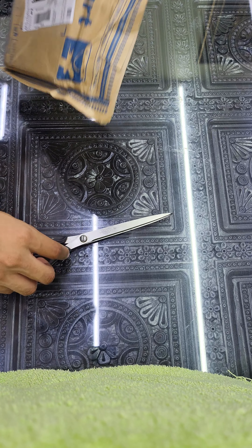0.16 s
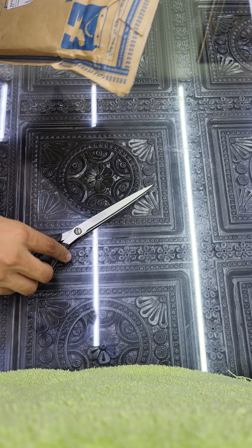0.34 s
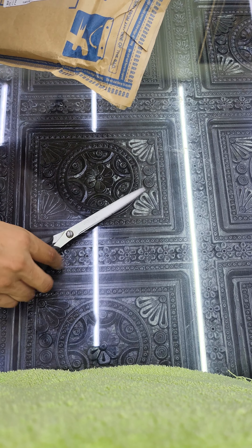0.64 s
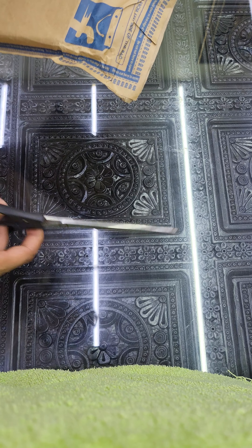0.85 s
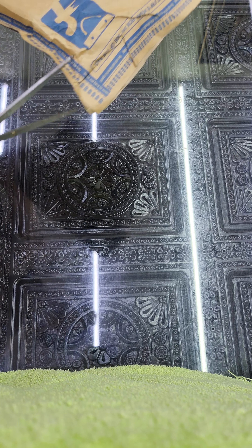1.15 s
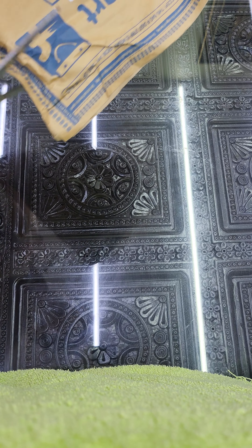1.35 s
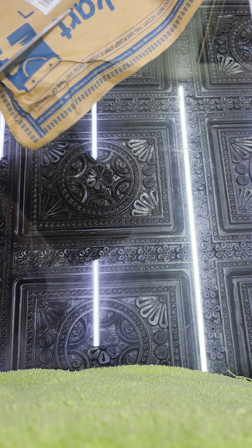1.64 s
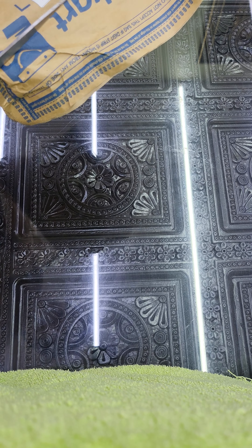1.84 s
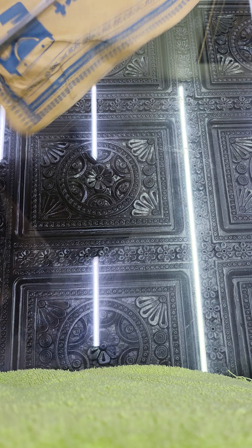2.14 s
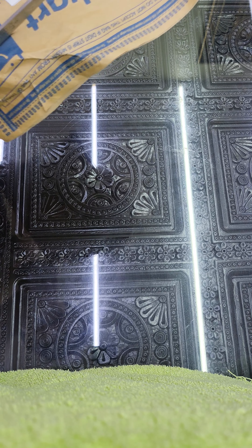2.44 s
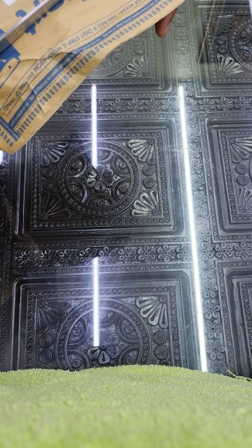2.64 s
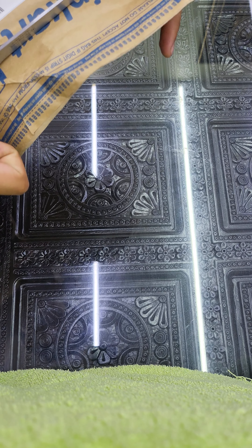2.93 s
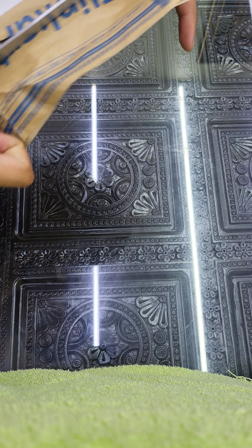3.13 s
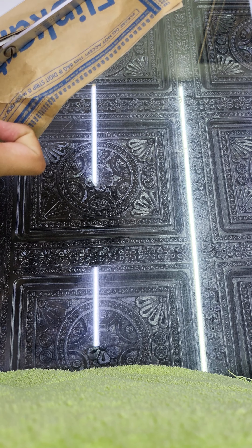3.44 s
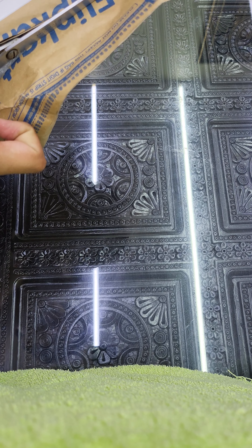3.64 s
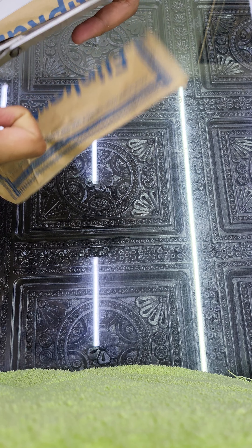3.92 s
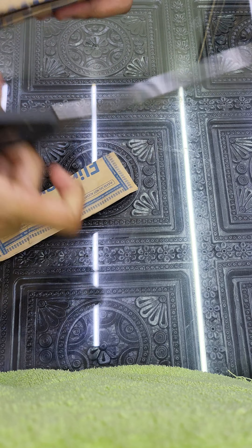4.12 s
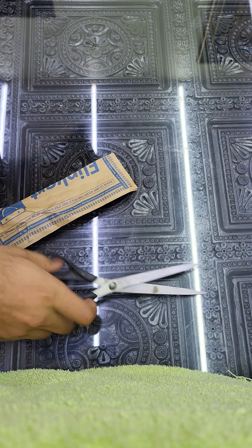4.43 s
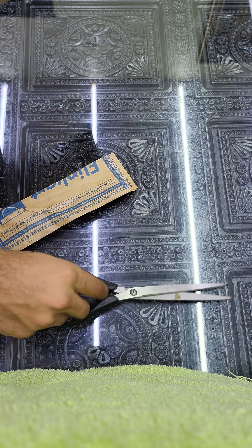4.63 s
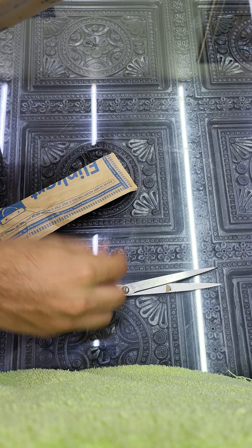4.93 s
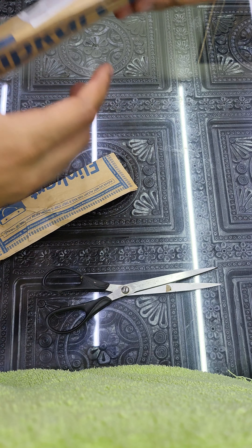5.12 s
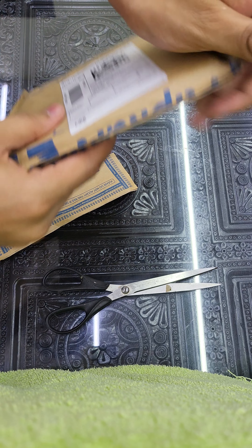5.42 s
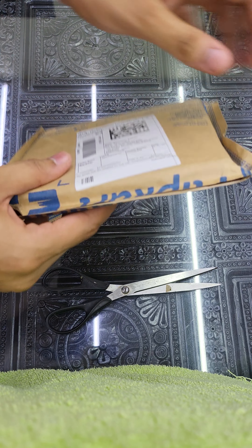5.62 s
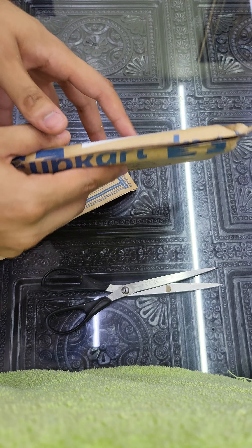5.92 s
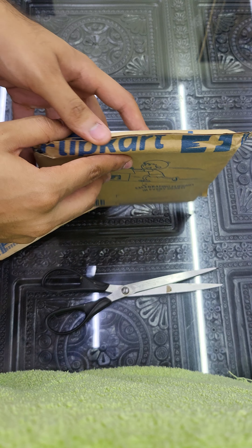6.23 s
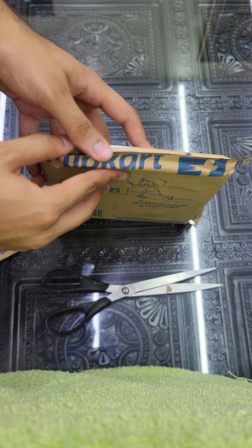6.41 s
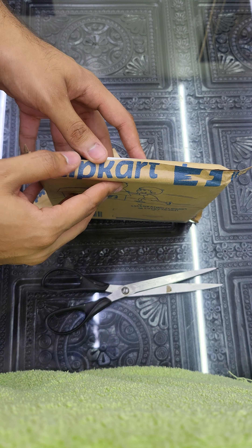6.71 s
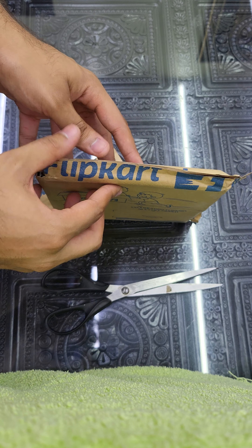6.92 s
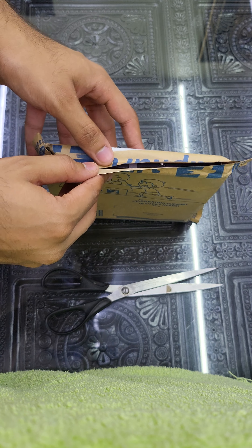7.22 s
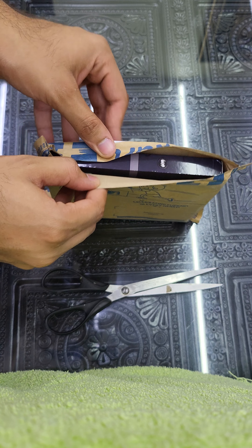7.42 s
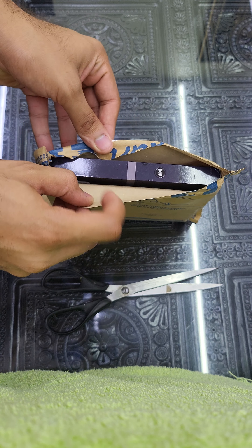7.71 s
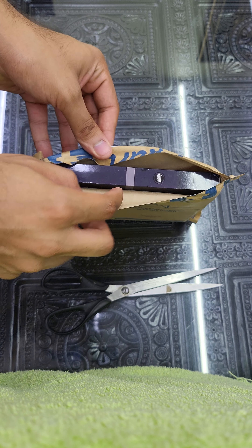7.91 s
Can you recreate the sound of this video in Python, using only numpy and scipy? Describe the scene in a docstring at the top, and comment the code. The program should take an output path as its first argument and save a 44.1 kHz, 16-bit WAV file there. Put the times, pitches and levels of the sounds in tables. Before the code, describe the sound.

Close stereo pickup in a bare, lively room with a low mains hum and soft fan. Scissors scrape and knock as they leave a hard table, then bite into a padded paper mailer with hollow pops, crunching and dry ticks. A bright steel snip ends the cut. The scissors clatter back down, then the paper is turned with soft taps, faint fingertip swishes and one tiny squeak, before crisp snaps as it opens.

```python
"""In a bare, ringing room with a low mains hum and a soft fan, someone opens a padded paper mailer.
Scissors leave a hard table, cut off the mailer's end and clatter back: noise bursts ring the steel blades
or the hard table top. Hands then turn the mailer and pull it open: noise bursts through creased paper snap
and boom like a small drum, while hiss and tiny rings make the rustle. Fingertips swish along the cut edge,
and one squeaks briefly. There are two microphones; the left one is nearer to the hands."""
import sys
import numpy as np
from scipy import signal
from scipy.fft import rfft, irfft, next_fast_len
from scipy.io import wavfile
from scipy.ndimage import map_coordinates

SR = 44100
rng = np.random.default_rng(int(sys.argv[2]) if len(sys.argv) > 2 else 0)


def persist_wave(psi):
    """Save psi, clipped to +-1, as 16-bit WAV."""
    counts = np.round(np.clip(psi, -1, 1) * 32767).astype(np.int16)
    wavfile.write(sys.argv[1], SR, np.atleast_2d(counts).T)


N = 355446  # length of the scene in samples


def amp(db):
    """Turn decibels into a gain."""
    return 10 ** (np.asarray(db) / 20)


def unit(x):
    """Scale a sound to an rms of 1."""
    return x / np.sqrt(np.mean(x ** 2) + 1e-20)


def along(points, hz):
    """Read a curve of (f/Hz, value) points at any pitch, on a log pitch axis."""
    f, v = np.transpose(points)
    return np.interp(np.log(hz + 1), np.log(f + 1), v)


def wobble(rate):
    """A smooth random curve with this many random points a second."""
    points = rng.standard_normal(int(N * rate / SR) + 4)
    return map_coordinates(points, [np.arange(N) * rate / SR], order=2)


def filtered(x, response):
    """Shape a sound by a response that depends on frequency."""
    n = x.shape[-1]
    padded = 2 * next_fast_len(n // 2 + 2048)
    spectrum = rfft(x, padded) * response(np.fft.rfftfreq(padded, 1 / SR))
    return irfft(spectrum, padded)[..., :n]


def causal(gain):
    """Turn a gain curve into a minimum-phase response, which rings only after the blow."""
    cepstrum = irfft(np.log(np.maximum(gain, 1e-6)))
    half = len(cepstrum) // 2
    cepstrum[1:half] *= 2
    cepstrum[half + 1:] = 0
    return np.exp(rfft(cepstrum))


def resonance(f, centre, width):
    """The response of one damped resonance."""
    return 1j * f * width / (centre * centre - f * f + 1j * f * width)


def ringing(hz, modes):
    """A hard body rings at its own resonances, with deep valleys between them."""
    power = sum(amp(db) * np.abs(resonance(hz, centre, width)) ** 2 for centre, width, db in modes)
    return causal(power)


def grains(rate, centre_hz, scatter, cycles, spread_db, size):
    """Tiny damped rings at random moments, each with its own pitch and force; rms 1."""
    count = int(rate * N / SR)
    when, force, pitch = rng.random((count, 3)).T
    hz = centre_hz * 2 ** (scatter * np.log((pitch + .02) / (1.02 - pitch)))
    turns = hz[:, None] * np.arange(size) / SR
    # each ring falls by 60 dB in the given number of cycles; a few are much stronger
    rings = np.sin(2 * np.pi * turns) * amp(-60 * turns / cycles + spread_db * force[:, None] ** 3)
    signs = rng.choice([-1, 1], (count, 1))
    index = (when * N).astype(int)[:, None] + np.arange(size)
    return unit(np.bincount(index.ravel(), (signs * rings).ravel(), N + size)[:N])


def add(track, s, sound):
    """Mix a sound into the track at time s."""
    start = max(round(s * SR), 0)
    part = sound[:, :N - start]
    track[:, start:start + part.shape[1]] += part


# how alike sound from all sides is at the two microphones: (f/Hz, likeness from 0 to 1)
LIKENESS = [(60, 0.81), (200, 0.87), (450, 0.51), (900, 0), (8000, 0.44)]


def diffuse(n, colour):
    """Noise from all sides: most alike at both microphones in the bass, unlike near 900 Hz."""
    def middle_and_side(hz):
        turn = np.arccos(np.clip(along(LIKENESS, hz), -1, 1)) / 2
        return amp(along(colour, hz)) * [np.cos(turn), np.sin(turn)]
    mid, side = filtered(rng.standard_normal((2, n)), middle_and_side)
    return np.array([mid + side, mid - side])


# how long the room rings at each pitch: (f/Hz, time to fall by 60 dB/s)
ROOM_DECAY = [(150, 0.53), (400, 0.65), (1200, 0.56), (3000, 0.59), (7000, 0.62), (15000, 0.55)]
# tone colour of the ringing: (f/Hz, relative level/dB)
ROOM_COLOUR = [(150, -5.5), (400, -2.5), (1200, 0.5), (3000, 4.5), (7000, 2), (15000, -4)]
LEAD_S, LEFT_DB = .00045, 6.5  # direct sound: head start and extra level at the left microphone
WALL_S, WALL_DB = .0072, -14.5  # nearest wall: delay, and level next to the direct sound


def in_room(x, direct_db, room_db):
    """Direct sound arrives first and louder at the left; one wall echo and a fresh random tail join it."""
    hz, t, z = signal.stft(diffuse(SR * 3 // 4, ROOM_COLOUR), SR, nperseg=256)
    decay = amp(-60 * t / along(ROOM_DECAY, hz)[:, None])
    tail = signal.istft(z * decay, SR, nperseg=256)[1]
    # reflections take a moment to build up
    tail *= 1 - np.exp(-(np.arange(tail.shape[1]) / SR / 0.0013) ** 2)
    tail /= np.linalg.norm(tail[0])
    out = signal.fftconvolve(x[None], tail, axes=1) * amp(room_db) * amp([[.3], [-.3]])
    late = filtered(x, lambda hz: np.exp(-2j * np.pi * hz * LEAD_S))
    out[:, :len(x)] += amp(direct_db) * np.array([x * amp(LEFT_DB / 2), late * amp(-LEFT_DB / 2)])
    echo = filtered(x, lambda hz: np.exp(-2j * np.pi * hz * WALL_S))
    out[:, :len(x)] += amp(direct_db + WALL_DB) * echo
    return out


RUN_UP_S, SPILL_FADE_S = .012, .03  # room left before the blow; time constant of the fade over it


def blow(body, db, boom_db, tilt_db, fizz_db, contact, boom_stretch):
    """A brief rough contact heard through a body; its bass has its own length."""
    t = np.arange(SR // 8) / SR - RUN_UP_S
    # fades what the flattened burst spills before the blow, which softens its onset
    spill_fade = np.exp(np.minimum(t, 0) / SPILL_FADE_S)

    def tilted_body(hz):
        return body(hz) * causal(amp(tilt_db * np.log2(np.clip(hz, 800, 5000) / 800)))

    bands = [  # (lowest and highest f/Hz, level next to the middle band/dB, time to fall by 60 dB/s)
        ((90, 800), boom_db, contact * boom_stretch),
        ((800, 8000), 0, contact),
        ((8000, 16000), fizz_db, contact)]
    sound = np.zeros(len(t))
    for band, share_db, life in bands:
        burst = rng.standard_normal(len(t)) * (t > 0) * amp(-60 * np.abs(t) / life)
        force = rfft(burst)
        # many tiny slips excite all pitches evenly: flatten the burst's spectrum
        force = spill_fade * irfft(force / (np.abs(force) + 1e-12), len(t))
        bandpass = signal.butter(4, band, "bandpass", fs=SR, output="sos")
        part = signal.sosfilt(bandpass, filtered(force, tilted_body))
        sound += amp(db + share_db) * part / np.linalg.norm(part)
    return sound


def strikes(events, body, boom_stretch, direct_db, room_db):
    """Play every blow of a table in the room, which rescales its level; last columns shape the body."""
    out = np.zeros((2, N))
    for s, db, boom_db, tilt_db, fizz_db, contact, *shape in events:
        sound = blow(lambda hz: body(hz, *shape), db, boom_db, tilt_db, fizz_db, contact, boom_stretch)
        add(out, s - RUN_UP_S, in_room(sound, direct_db, room_db))
    return out


FIZZ_PER_TILT = 2.27  # dB of fizz for each dB per octave of brightness


def fizz(base_db, tilt_db):
    """A harder contact is brighter and fizzes more: level of its top octave."""
    return base_db + FIZZ_PER_TILT * tilt_db


# tone colour of creased paper as a phone records it, dull above 8 kHz: (f/Hz, relative level/dB)
CREASE_COLOUR = [(80, -8), (150, -10.5), (205, -3), (320, 6), (470, 6.5), (620, 1), (760, -3.5), (880, 0.5),
                 (1050, -1), (1400, 1.5), (1750, -4.5), (2100, -0.5), (2800, 1), (4100, -3), (5200, -5.5),
                 (7600, -8), (8600, -26), (16000, -24)]
FOLD_DB, FOLD_OCTAVES = 3.5, .13  # greatest height and spacing of a fold's random peaks and dips
PANEL_Q = 13  # sharpness of the panel's note under a bite


def panel(hz, note_hz, note_db, q):
    """Each fold of paper has its own uneven resonances, and one flexing panel's note stands out."""
    place = np.log2(np.maximum(hz, 200) / 200) / FOLD_OCTAVES
    folds = FOLD_DB * np.tanh(map_coordinates(rng.standard_normal(size=64), [place], order=2))
    note = 1 + (amp(note_db) - 1) * resonance(hz, note_hz, note_hz / q)
    return causal(amp(along(CREASE_COLOUR, hz) + folds)) * note


# steady mains hum: (f/Hz, rms level/dB)
MAINS_HUM = [(100.15, -52.5)]
# lines of the fan motor, around which they waver: (f/Hz, peak level/dB)
FAN_LINES = [(75.2, -63), (149.6, -70)]
# tone colour of the fan's rush of air: (f/Hz, relative level/dB)
AIR_COLOUR = [(15, -45.5), (25, -32), (50, -4.5), (75, -4.5), (108, -8), (137, -15.5), (185, -10),
              (275, -23.5), (317, -4), (355, -19), (410, -15.5), (516, -22), (1890, -30), (3080, -35.5),
              (3520, -28), (5140, -42), (7510, -42), (16000, -65.5)]
FAN_WAVER_DB = 1.5


def room_tone():
    """Steady mains hum, the wavering lines of a fan motor and its soft rush of air."""
    t = np.arange(N) / SR
    hum = sum(amp(db + 3.0) * np.sin(2 * np.pi * hz * t) for hz, db in MAINS_HUM)  # rms to peak: +3 dB
    fan = np.zeros(N)
    for hz, db in FAN_LINES:
        level = amp(db + FAN_WAVER_DB * wobble(3.6))
        fan += level * np.sin(2 * np.pi * hz * t + .5 * wobble(2.8))
    rush = amp(-57.5) * unit(diffuse(N, AIR_COLOUR))
    return (hum + fan) * amp([[-.3], [.3]]) + rush


# strokes of fingers or blades along the paper, levels before mixing:
# (start t/s, length/s, rustle level/dB, hollow boom level/dB)
PAPER_STROKES = [(0.0, 0.067, -62.5, -51), (1.476, 0.112, -50.5, -41), (1.717, 0.081, -52.5, -43.5),
                 (1.973, 0.14, -51, -35.5), (2.012, 0.068, -48.5, -48), (2.348, 0.124, -41.5, -54),
                 (2.509, 0.15, -45.5, -39.5), (2.751, 0.31, -46.5, -35.5), (2.814, 0.044, -52.5, -55),
                 (3.125, 0.21, -47.5, -37), (3.196, 0.074, -46.5, -52), (3.489, 0.26, -66, -45),
                 (5.256, 0.12, -54, -46), (5.421, 0.19, -54.5, -46), (5.906, 0.19, -63, -48),
                 (6.093, 0.34, -62, -47.5), (6.436, 0.097, -63, -62.5), (6.815, 0.17, -59, -60),
                 (7.042, 0.095, -65, -60.5), (7.37, 1, -61, -44), (7.66, 0.04, -83.5, -66),
                 (7.88, 0.15, -97, -71)]
# tone colour of the sliding hiss as a phone records it, duller above 8 kHz: (f/Hz, relative level/dB)
PAPER_COLOUR = [(88, -44), (150, -24), (422, -10.5), (524, -42.5), (624, 10), (702, -1), (871, -3),
                (1060, -4.5), (1420, -11.5), (2920, -10.5), (5150, -19), (7470, -20), (8730, -32.5),
                (11700, -27), (16000, -36.5)]
STROKE_RISE_SHARE, STROKE_RELEASE_S = 0.13, 0.0053  # rise as a share of the stroke; fade at lift-off
UNEVEN_DB, UNEVEN_RATE = 2.0, 45  # uneven hand: depth, random points a second
CRACKLE_SHARE = 0.5  # gain of the sparse sharp crackles heard under any touch


def rustle():
    """Fingers and blades work the paper: hiss, crunching fibres and slower jerks drumming on the mailer."""
    t = np.arange(N) / SR
    fine, hollow = np.zeros(N), np.zeros(N)
    for s, length, rustle_db, boom_db in PAPER_STROKES:
        rise = np.clip((t - s) / (STROKE_RISE_SHARE * length), 0, 1)
        release = np.clip(1 - (t - s - length) / STROKE_RELEASE_S, 0, 1)
        fine += rise * release * amp(rustle_db)
        hollow += rise * release * amp(boom_db)
    # a firm grip sticks and crunches, a light touch mostly slides
    firmness = fine / (fine + amp(-46.5))
    grip = unit(amp(0.88 * firmness * wobble(90) + UNEVEN_DB * wobble(UNEVEN_RATE)))

    def hiss_colour(hz):
        without_bass = 1 / (1 + (850 / (hz + 1)) ** 4)
        return amp(along(PAPER_COLOUR, hz)) * without_bass

    hiss = unit(filtered(rng.standard_normal(N), hiss_colour))
    fibres = grains(rate=520, centre_hz=2400, scatter=.5, cycles=10, spread_db=15, size=512)
    jerks = grains(rate=110, centre_hz=423.0, scatter=0.23, cycles=16.0, spread_db=13.0, size=2048)
    crackles = grains(rate=70, centre_hz=3800, scatter=0.6, cycles=4, spread_db=14, size=256)
    crunch = np.sqrt(1 - firmness ** 2) * hiss + firmness * fibres + CRACKLE_SHARE * crackles
    sound = grip * (fine * crunch + amp(-12.0) * hollow * jerks)
    return in_room(sound, direct_db=-4, room_db=-7)[:, :N]


# paper buckles, scuffs or drops, in the hands, under the blades or on the table:
# (t/s, level/dB, boom/dB, brightness/dB per octave, contact/s,
# panel note f/Hz, strength of that note/dB, its sharpness Q)
PAPER_SNAPS = [(0.063, -20.5, 3, -7.5, 0.025, 706, 15, 12), (0.206, -20, -15, -8, 0.035, 3980, 19, 5.2),
               (0.199, -4.5, -5, -11.5, 0.36, 445, 14, 12), (1.51, -10, -4.5, -4, 0.11, 1860, 12, 20),
               (1.556, -9, -7.5, -7.5, 0.018, 1660, 11.5, 14), (2.217, 3, -18, -4, 0.0024, 3100, 15, 1.1),
               (2.24, -19, 6, -3, 0.06, 3900, 13, 4), (4.156, -8.5, -9, -4.5, 0.037, 1160, 8, 5),
               (4.19, -12, 2.5, -2, 0.0096, 738, 15, 6), (5.501, -12, -28, -3, 0.045, 1140, 13, 13),
               (7.158, -17.5, -5, -6, 0.0097, 2530, 12, 6), (7.159, -16, -14, -1.5, 0.0064, 3560, 14, 12),
               (7.496, -9.5, -15, -3, 0.004, 3170, 17, 2.5), (7.661, 2, -2, -5, 0.0069, 1550, 7, 3.6),
               (7.665, -16, 8, -19, 0.032, 700, 24, 10), (7.676, -15, -5, -3, 0.031, 1160, 15, 4.4),
               (7.69, -14, -14, -8, 0.13, 2150, 29, 7.6), (7.829, -17.5, -8, -11.5, 0.0097, 2140, 13, 6),
               (7.982, -6.5, -9, -6, 0.0088, 614, 16, 8.6), (7.992, -18.5, 8, -9, 0.035, 617, 23, 7)]
SNAP_FIZZ_DB = -14  # before brightness is added


def paper_snaps():
    """Creased paper cracks or scuffs, one of its panels rings briefly and the air in the mailer booms."""
    snaps = [(s, db, boom, tilt, fizz(SNAP_FIZZ_DB, tilt), contact, *note)
             for s, db, boom, tilt, contact, *note in PAPER_SNAPS]
    return strikes(snaps, panel, boom_stretch=2.6, direct_db=-4.0, room_db=-5.5)


# fingertips tap the mailer: (t/s, level/dB, boom/dB, panel note f/Hz)
FINGER_TAPS = [(0.133, -25, -6, 1290), (0.187, -34.5, 16, 202), (4.029, -14.5, -6, 607),
               (5.303, -19.5, -4, 1200), (5.356, -16.5, -8, 1064), (5.741, -22, -4, 1050),
               (5.864, -21.5, -14, 1110), (5.983, -27.5, 0, 764)]
TAP_TILT_DB, TAP_FIZZ_DB, TAP_CONTACT_S = -7, -38, 0.0097  # tilt is per octave
TAP_NOTE_DB, TAP_Q = 15, 18


def finger_taps():
    """Soft fingertips give a short, dull blow that sets a paper panel ringing."""
    taps = [(s, db, boom, TAP_TILT_DB, TAP_FIZZ_DB, TAP_CONTACT_S, hz, TAP_NOTE_DB, TAP_Q)
            for s, db, boom, hz in FINGER_TAPS]
    return strikes(taps, panel, boom_stretch=1.6, direct_db=0, room_db=-7)


# the blades slide and click together: (t/s, level/dB, thump/dB, brightness/dB per octave, contact/s)
BLADE_CLICKS = [(0.161, -33, -18, -10, 0.0054), (0.534, -31, -11, 1, .006), (0.673, -25.5, 6, -4, 0.025),
                (0.99, -28, -21, 1.5, 0.077), (1.053, -27.5, -16, -2, 0.0052), (1.458, -33, 1, -9, 0.0052),
                (3.914, -9, -10, -6, 0.0045), (3.918, 4.5, -8, 0, 0.0064), (3.929, -12, -15, 7, 0.052),
                (4.618, -37, -15, 0, .012), (7.97, -25.5, -14, -5, 0.0071)]
# the steel blades' resonances: (f/Hz, width/Hz, relative level/dB)
BLADE_MODES = [(421, 540, 3.5), (1320, 530, 2), (2040, 160, 6), (2476, 280, 2), (3420, 800, -6),
               (4200, 810, -1), (5780, 500, -1), (7700, 960, 0), (9960, 1900, -1), (12700, 2100, 0.5),
               (6000, 9400, -7)]
SNIP_FIZZ_DB = -3.5  # before brightness is added


def snips():
    """The blades slide or click against each other, and the steel rings."""
    clicks = [(s, db, thump, tilt, fizz(SNIP_FIZZ_DB, tilt), contact)
              for s, db, thump, tilt, contact in BLADE_CLICKS]
    return strikes(clicks, lambda hz: ringing(hz, BLADE_MODES),
                   boom_stretch=2.3, direct_db=-2.5, room_db=-6.0)


# the scissors knock on the table:
# (t/s, level/dB, thump/dB, brightness/dB per octave, fizz/dB, contact/s, how they touch)
TABLE_KNOCKS = [(0.389, -3, -7.5, -3, -21, 0.038, "lifted"), (0.412, -8.5, 0.5, -8.5, -30, 0.036, "lifted"),
                (0.534, -10.5, 0.5, 0, -15.5, 0.023, "lifted"), (4.47, -7.5, 0, 2, -5.5, 0.013, "set down"),
                (4.703, -7, -8, 0.5, -7, 0.0086, "dropped"), (4.722, -13, -1.5, -2, -26, .014, "set down"),
                (4.807, 2, 2, -3, -11, 0.009, "dropped"), (4.813, 3, -2, -3, -13, 0.014, "dropped"),
                (4.845, 4, -3, -3, -30, 0.017, "dropped"), (4.862, -1.5, -3, -5.5, -27, 0.0064, "dropped"),
                (4.876, -7, 0.5, -7, -23, 0.007, "dropped")]
# table and scissors ring together, in a way that depends on the touch:
# (f/Hz, width/Hz, then relative level/dB if lifted, set down, dropped)
TABLE_MODES = [(156, 103, -10, -6.5, -4.5), (284, 420, -13.5, -34, -5.5), (413, 71, -1.5, -4.5, -0.5),
               (524, 97, -22, 0.5, -46), (622, 63, -8, -11, -3), (927, 290, -7, -6.5, -41),
               (1180, 250, -14, -5, -36), (1350, 264, -13.5, -12, -4.5), (1513, 150, -9.5, -22, -22),
               (1857, 250, -15.5, -28, -11), (2370, 150, -15.5, -15, -20), (2630, 144, -23, -8.5, -12),
               (3600, 340, -20, -23.5, -25), (3800, 2000, -65, -42, -20.5), (4630, 240, -31, -15.5, -39),
               (5770, 430, -26, -22, -24), (6350, 450, -36, -23, -31), (7600, 870, -37, -23.5, -31),
               (9950, 1400, -52, -19, -37), (11700, 1280, -39, -23, -37), (13600, 3400, -38, -12, -22.5)]
# ways of touching, in the order of those level columns: (name)
TOUCH_NAMES = ["lifted", "set down", "dropped"]


def knocks():
    """The scissors strike the table top, which radiates mostly into the room."""
    def top(hz, touch):
        column = TOUCH_NAMES.index(touch)
        modes = [(centre, width, levels[column]) for centre, width, *levels in TABLE_MODES]
        return ringing(hz, modes)
    return strikes(TABLE_KNOCKS, top, boom_stretch=0.83, direct_db=-9.5, room_db=.5)


# separate fibres part under the blades or fingers: (t/s, level/dB, boom/dB, panel note f/Hz)
PARTING_FIBRES = [(1.052, -27, -16, 2290), (2.376, -16, -8, 5640), (2.586, -14, -7, 2760),
                  (2.641, -18, -5, 2700), (2.668, -25, 10, 2400), (2.777, -22.5, 2.5, 880),
                  (2.907, -15, -11, 6100), (2.944, -32, -11, 3080), (2.967, -12, 3, 3270),
                  (3.001, -17, 5, 2500), (3.045, -13.5, 1.5, 2190), (3.162, -17, -14.5, 3780),
                  (3.201, -22.5, -2.5, 2190), (3.307, -18.5, 2, 2710), (3.326, -15, 3, 2720),
                  (3.373, -14, 3, 2530), (3.39, -15.5, 1, 2700), (3.414, -21.5, -4, 2740),
                  (3.503, -18.5, -0.5, 2500), (3.533, -16, -5, 2700), (3.537, -15.5, 2.5, 2297),
                  (3.555, -24.5, 14, 2600), (3.582, -20.5, 2.5, 2960), (3.652, -17.5, 1, 2570),
                  (3.713, -21, 2, 2900), (3.756, -14.5, -3, 2530), (3.783, -19, 0.5, 3170),
                  (3.805, -15, 4, 2080), (3.857, -27, -12, 7030), (5.502, -23, -7, 2500),
                  (5.941, -24, 0, 2560), (6.012, -31, -12, 6300), (6.609, -33, -20, 6200),
                  (7.408, -33, -16, 4270), (7.433, -43, -15, 2970)]
TICK_TILT_DB, TICK_FIZZ_DB, TICK_CONTACT_S = -2, -9.5, 0.016  # tilt is per octave
TICK_NOTE_DB, TICK_Q = 9, 12


def fibre_ticks():
    """Each parting fibre plucks the taut paper: a short, dry tick."""
    ticks = [(s, db, boom, TICK_TILT_DB, TICK_FIZZ_DB, TICK_CONTACT_S, hz, TICK_NOTE_DB, TICK_Q)
             for s, db, boom, hz in PARTING_FIBRES]
    return strikes(ticks, panel, boom_stretch=3, direct_db=-3, room_db=-10)


# the blades catch and bite into the padded edge:
# (t/s, level/dB, boom/dB, brightness/dB per octave, contact/s, panel note f/Hz)
BLADE_BITES = [(1.222, -14.5, 1, -7, 0.05, 464), (1.701, -8.5, 7.5, -8, 0.0056, 456),
               (1.972, -18.5, 7, -12.5, 0.022, 425), (2.19, -2.5, 4.5, -7.5, 0.014, 483),
               (2.195, -3.5, 8, -7, 0.016, 274), (2.227, -4.5, 3.5, -1.5, 0.0053, 410),
               (2.418, -9, 6, -2.5, 0.09, 400), (2.926, -8.5, 5.5, -4, 0.0081, 356),
               (3.22, -9, -6, -6.5, 0.09, 600), (3.252, -4.5, -2, -6, 0.079, 850),
               (3.267, -8.5, -1.5, -16, 0.038, 870), (3.325, -19.5, 9, -12.5, 0.059, 610)]
BITE_FIZZ_DB, BITE_NOTE_DB = -1, 8  # fizz before brightness is added; strength of the panel note


def blade_bites():
    """The blades jerk the padded edge, so a paper panel cracks, rings and booms."""
    bites = [(s, db, boom, tilt, fizz(BITE_FIZZ_DB, tilt), contact, hz, BITE_NOTE_DB, PANEL_Q)
             for s, db, boom, tilt, contact, hz in BLADE_BITES]
    return strikes(bites, panel, boom_stretch=2.6, direct_db=-4.0, room_db=-5.5)


# fingertips skim along the cut edge:
# (start t/s, length/s, level at the height of the swell/dB before the room)
EDGE_SWIPES = [(5.432, 0.084, -56), (6.0, 0.078, -63), (6.144, 0.11, -60.5), (6.22, 0.21, -60),
               (6.662, 0.13, -57.5), (6.824, 0.051, -57.5), (6.87, 0.099, -56), (7.112, 0.07, -59),
               (7.398, 0.068, -57)]
# tone colour of the swish as a phone records it, dull above 8 kHz: (f/Hz, relative level/dB)
EDGE_COLOUR = [(300, -28), (1000, 1), (2000, -4.5), (3500, 2.5), (5200, -5), (7500, -2.5), (8700, -18.5),
               (16000, -18)]


def swipes():
    """A fingertip flicks the edge's fibres at random moments: a grainy swish that swells and fades."""
    t = np.arange(N) / SR
    swell = sum(amp(db) * np.sin(np.pi * np.clip((t - s) / length, 0, 1)) for s, length, db in EDGE_SWIPES)
    hits = rng.random(N) < 1500 / SR  # about 1500 flicks a second
    flicks = hits * rng.standard_normal(N) * amp(2.5 * wobble(70))
    swish = unit(filtered(flicks, lambda hz: causal(amp(along(EDGE_COLOUR, hz)))))
    return in_room(swell * swish, direct_db=-3, room_db=-8)[:, :N]


# a fingertip squeaks on the glossy label: (t/s, length/s, f/Hz, peak level/dB before the room)
LABEL_SQUEAKS = [(6.496, 0.018, 1373, -49.5)]
SQUEAK_WAVER = 0.012  # share of the pitch


def squeaks():
    """Skin sticks and slips at a nearly steady rate: a tiny whistle that hangs in the room."""
    t = np.arange(N) / SR
    sound = np.zeros(N)
    for s, length, hz, db in LABEL_SQUEAKS:
        phase = 2 * np.pi * np.cumsum(hz * (1 + SQUEAK_WAVER * wobble(150))) / SR
        swell = np.sin(np.pi * np.clip((t - s) / length, 0, 1)) ** 2
        sound += amp(db) * swell * np.sin(phase)
    return in_room(sound, direct_db=1, room_db=-10)[:, :N]


def scene():
    """Paper, scissors, fingers and the room together."""
    paper = rustle() + paper_snaps() + finger_taps() + fibre_ticks() + blade_bites()
    scissors = snips() + knocks()
    return room_tone() + paper + scissors + swipes() + squeaks()


# widening of the stereo image, strongest near 500 Hz: (f/Hz, gain of the left-right difference/dB)
STEREO_WIDTH = [(100, 0), (250, 1), (500, 5.5), (1100, 3.5), (2200, 3.5), (5000, 2)]
TOP_HZ = 16000  # band limit


def record(dry):
    """The recorder widens the stereo image and cuts steeply above its band limit."""
    mid = (dry[0] + dry[1]) / 2
    side = filtered((dry[0] - dry[1]) / 2, lambda hz: amp(along(STEREO_WIDTH, hz)))
    stereo = np.array([mid + side, mid - side])
    return filtered(stereo, lambda hz: 1 / (1 + (hz / TOP_HZ) ** 120))


dry = scene()
out = record(dry)
persist_wave(out)
```